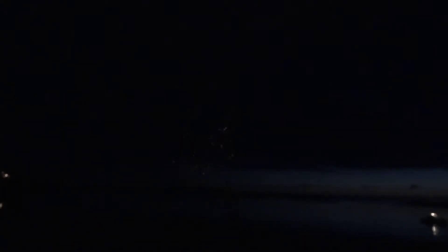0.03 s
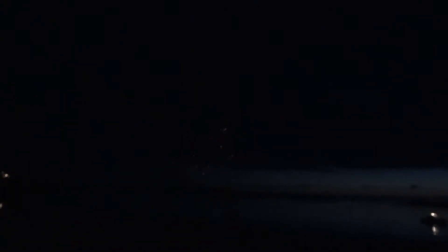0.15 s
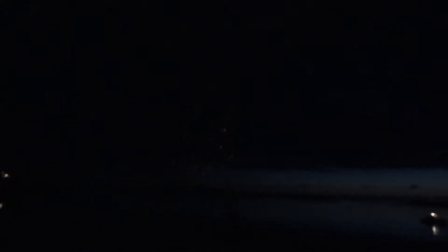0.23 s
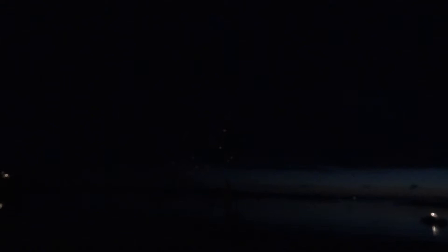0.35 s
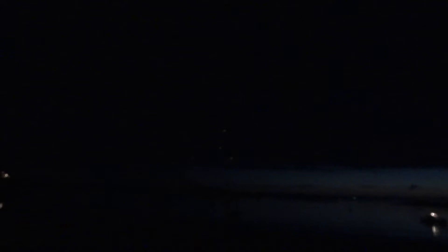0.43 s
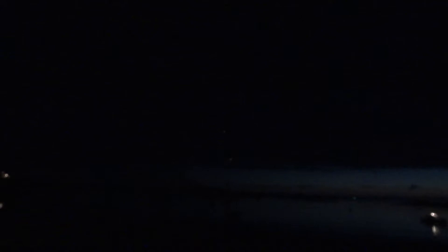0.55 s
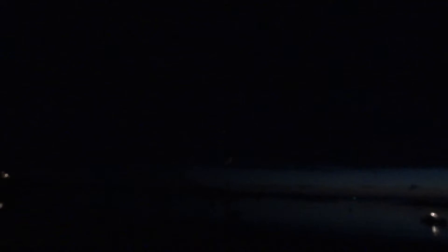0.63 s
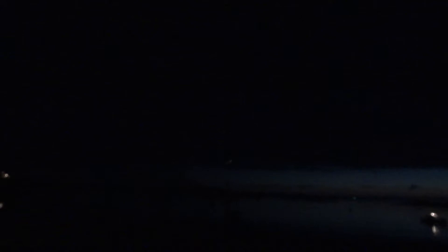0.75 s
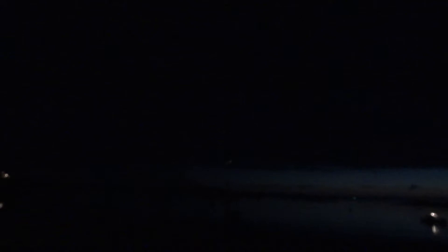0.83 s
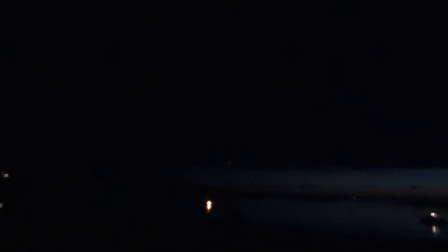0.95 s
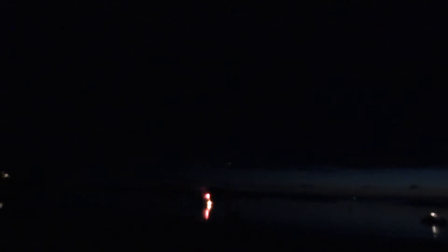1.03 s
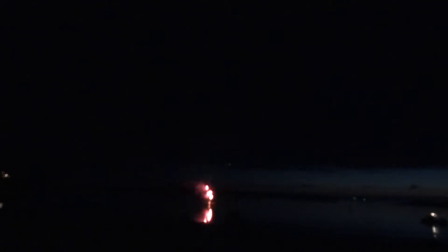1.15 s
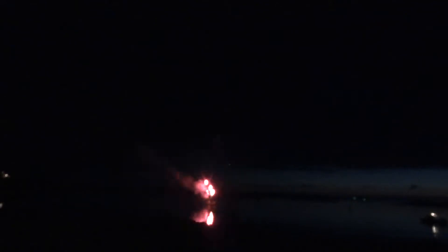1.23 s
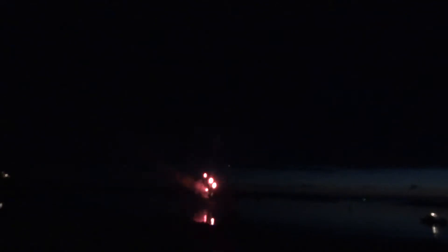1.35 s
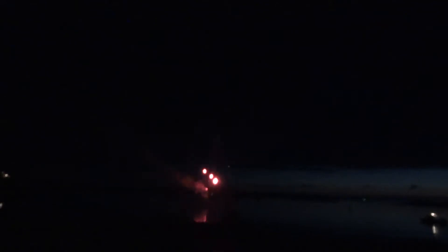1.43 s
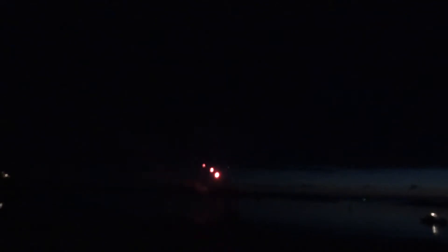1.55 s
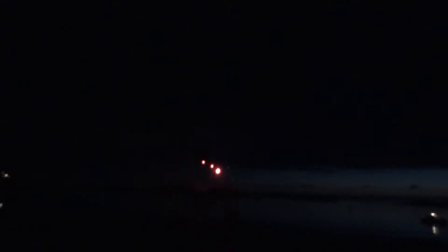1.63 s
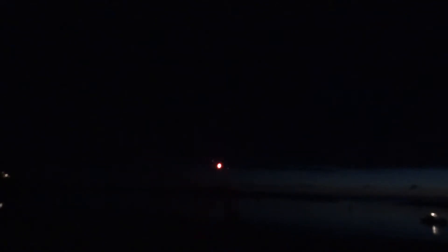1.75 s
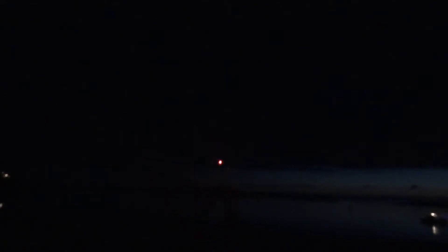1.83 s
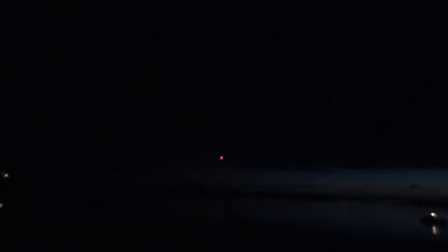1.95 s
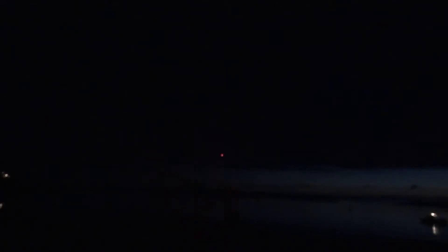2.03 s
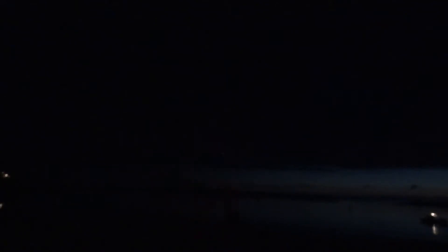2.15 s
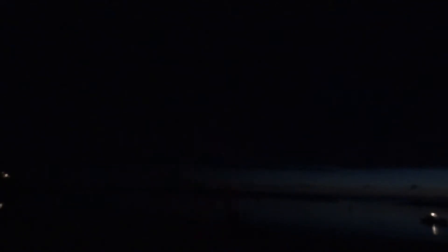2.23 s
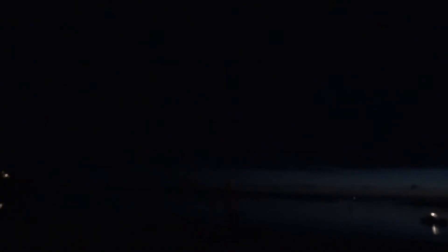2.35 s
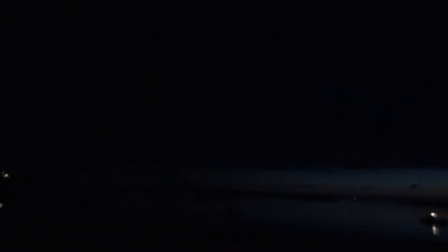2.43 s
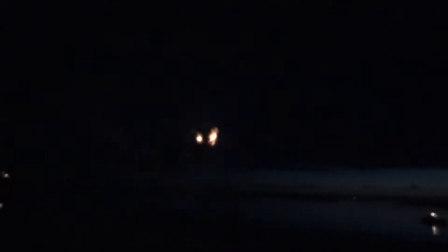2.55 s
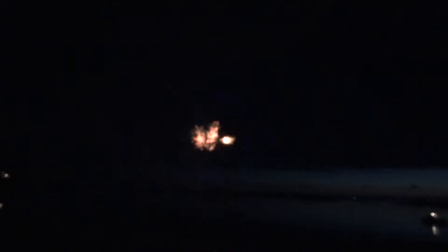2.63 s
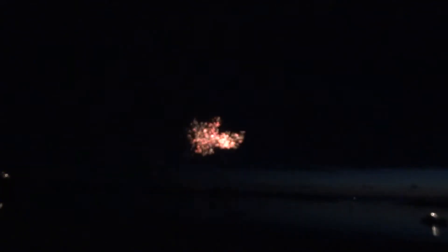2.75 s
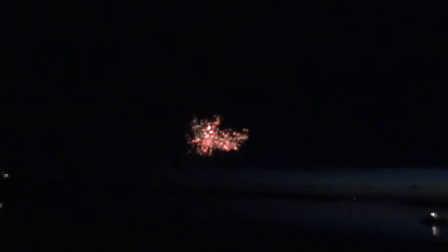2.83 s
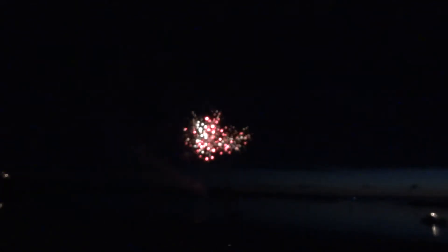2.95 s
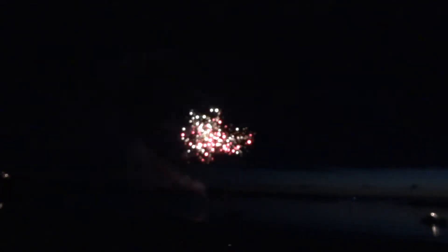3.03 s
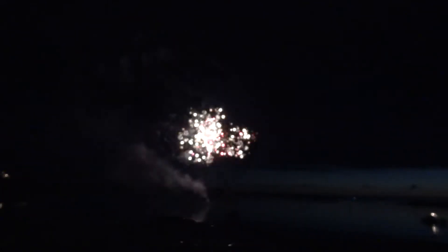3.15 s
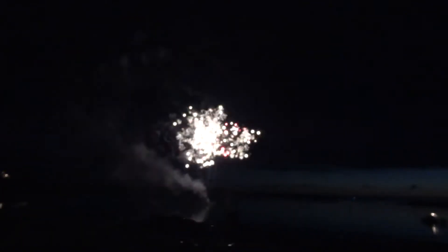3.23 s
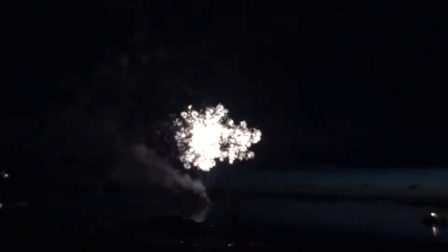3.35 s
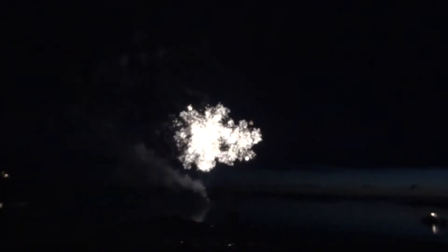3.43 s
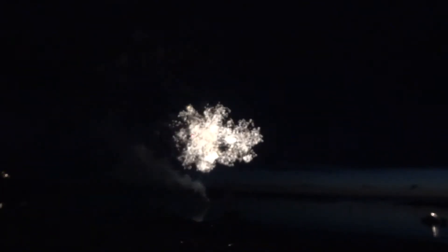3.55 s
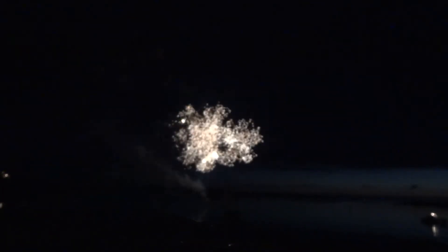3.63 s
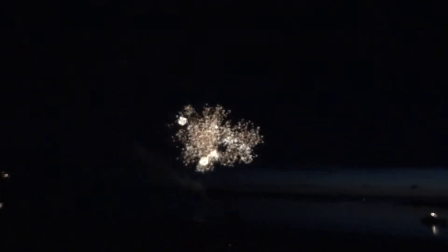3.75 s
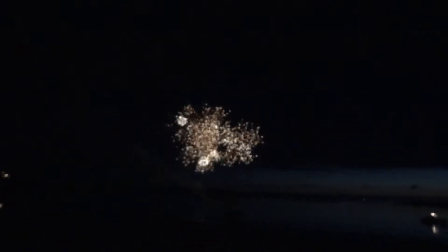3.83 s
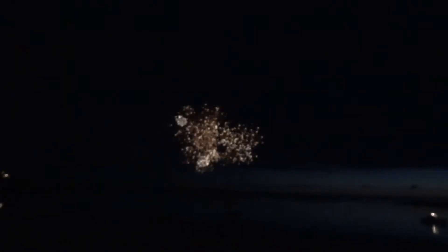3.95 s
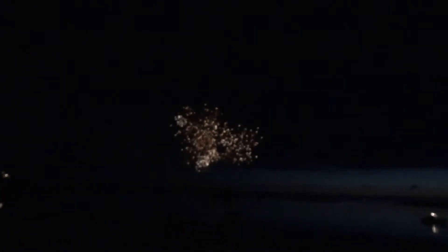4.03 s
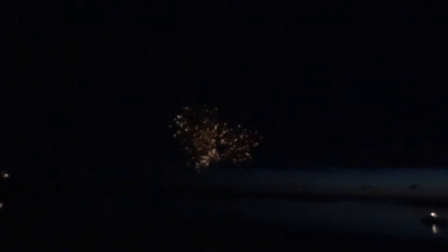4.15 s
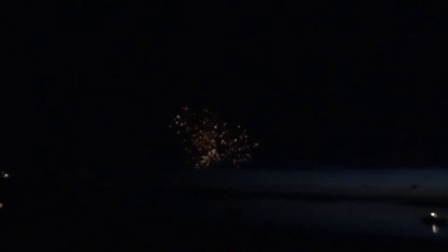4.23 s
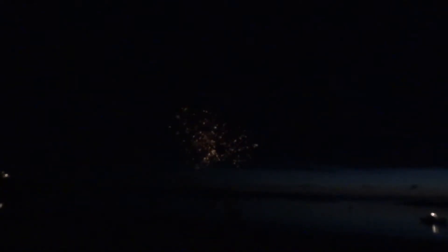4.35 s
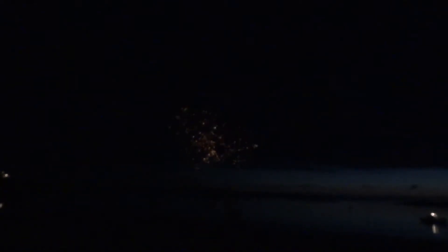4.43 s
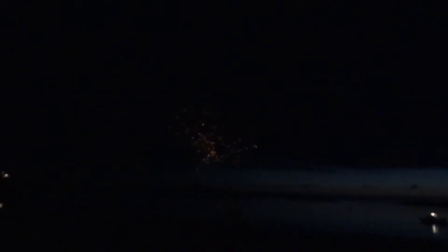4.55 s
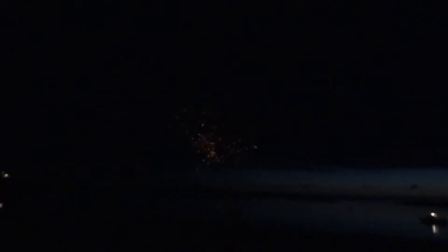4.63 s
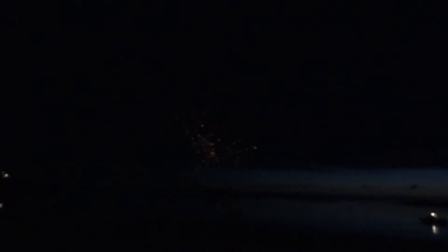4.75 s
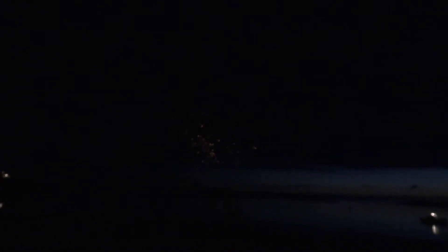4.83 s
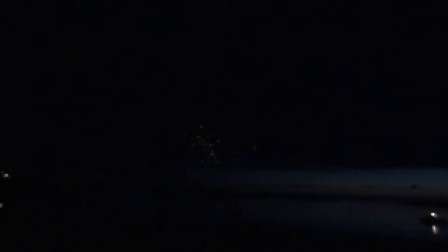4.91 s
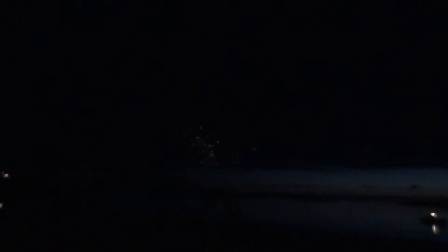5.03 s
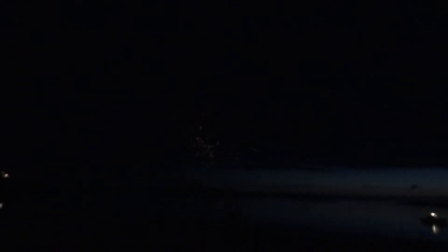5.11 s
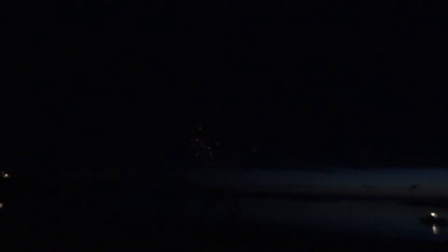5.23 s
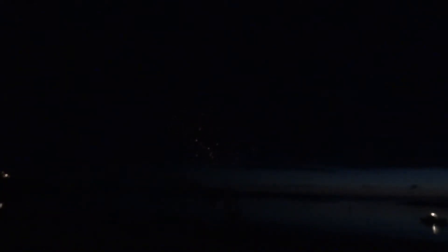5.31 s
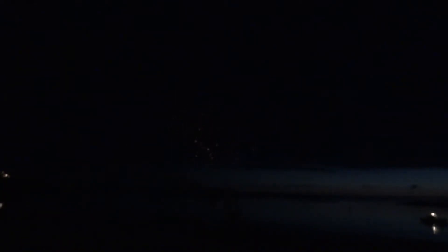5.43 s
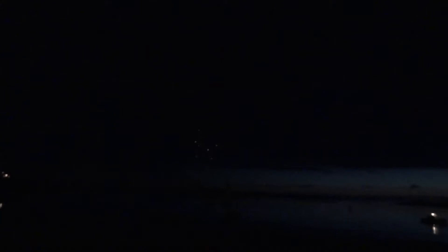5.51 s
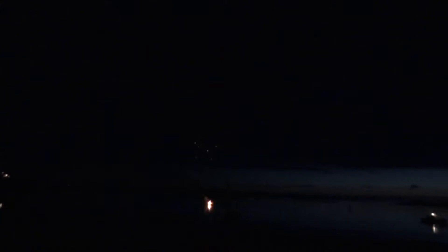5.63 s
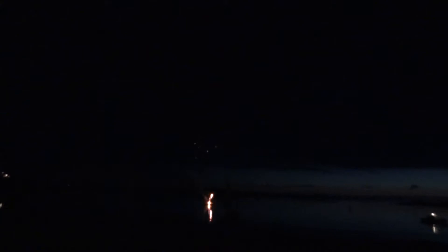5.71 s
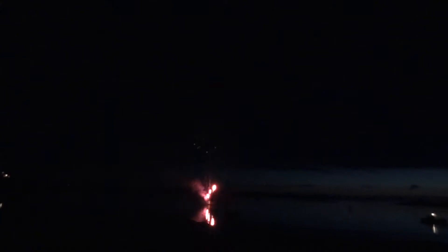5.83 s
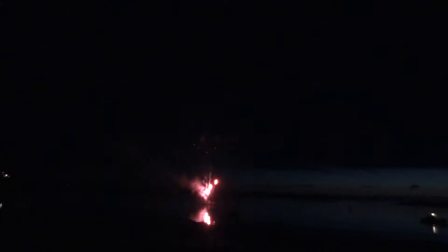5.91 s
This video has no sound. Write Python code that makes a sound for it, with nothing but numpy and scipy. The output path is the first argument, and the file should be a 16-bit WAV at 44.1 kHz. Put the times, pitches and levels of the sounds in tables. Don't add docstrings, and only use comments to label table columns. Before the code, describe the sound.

Night fireworks across a harbour, heard in stereo from the shore. From 0 to 1.6 s, soft distant thuds and low rumble of an earlier salvo fade, with faint clicks of the camera in the hand and a firmer creak near 1.5 s. At 1.64-1.75 s three hard launch cracks fire in quick succession, with a short rattle and wall slaps, then a falling rumble. Close plastic creaks come around 1.95, 2.2 (with a tiny squeak) and 2.7 s. At 3.18-3.38 s a tight volley of very loud thumping bursts, slightly squashed, with late bangs at 3.6 and 3.7 s. Sharp pops begin among them, swelling into dense dry crackle, thickest near 3.9 s, thinning to loud snaps and ending at 4.3 s. A big echo thump at 4.54 s and softer ones near 5 s follow, over a dull roll and airy rush fading to 6 s.

```python
import sys
import numpy as np
from scipy import signal
from scipy.fft import rfft, irfft
from scipy.io import wavfile
from scipy.ndimage import uniform_filter1d

SR = 44100
rng = np.random.default_rng(int(sys.argv[2]) if len(sys.argv) > 2 else 0)


def amp(db):
    return 10 ** (np.asarray(db, float) / 20)


def write(x):
    x = np.atleast_2d(x).T
    wavfile.write(sys.argv[1], SR, np.round(np.clip(x, -1, 1) * 32767).astype(np.int16))


N = 263718

# start_s, thump_db, front_db
BANGS = [(1.6418, -7, -9), (1.7035, -8, -13), (1.7496, -8, -8), (3.1811, -7, -8), (3.1908, -6, -8),
         (3.2208, -9, -15), (3.2278, -6, -8), (3.2375, -7, -9), (3.2664, -14, -12), (3.2962, -7, -8),
         (3.3055, -6, -8), (3.3369, -6, -16), (3.3638, -10, -15), (3.3819, -12, -10), (3.6032, -10, -14),
         (3.7273, -7, -14)]
# start_s, level_db
THUDS = [(0.0169, -26), (0.0609, -23), (0.2397, -19), (0.3533, -29), (0.8344, -27), (1.4008, -26),
         (1.546, -28), (1.6584, -18), (1.721, -17), (1.7244, -17), (1.9571, -17), (2.2334, -23),
         (2.5569, -24), (2.6182, -26), (2.9631, -25), (3.5183, -7), (3.7397, -10), (3.7628, -8),
         (4.5416, -8), (4.9569, -16), (4.9655, -17), (5.1057, -17), (5.1213, -18), (5.2765, -20)]
# freq_hz, level_db
BOOM_COLOUR = [(15, -17), (30, -19), (60, -6.5), (110, -0.5), (160, 0.5), (300, -1), (1000, -69)]
# freq_hz, level_db
BARGE_COLOUR = [(150, -29), (500, 1), (1000, 2.5), (2200, 3), (4500, -8.5), (7000, -19.5), (11000, -38)]
# freq_hz, level_db
QUAY_COLOUR = [(60, -39), (300, -7.5), (1000, -2), (3000, -15.5), (6000, -22.5), (12000, -28.5)]

# start_s, level_db
POPS = [(3.2519, -20), (3.283, -15), (3.2927, -14), (3.353, -19), (3.4299, -14), (3.448, -17),
        (3.5427, -17), (3.5455, -18), (3.56, -15), (3.6077, -15), (3.622, -9), (3.628, -11), (3.6445, -7),
        (3.6545, -12), (3.6724, -12), (3.6777, -15), (3.6848, -8), (3.6988, -10), (3.7025, -8),
        (3.7095, -10), (3.7178, -8), (3.7519, -8), (3.7599, -9), (3.7701, -7), (3.7743, -7), (4.25, -7),
        (4.2554, -7), (4.3013, -6), (4.3037, -7), (4.3131, -10),
        (4.0737, -7), (4.0774, -7), (4.0811, -8), (4.0903, -10), (4.0977, -7), (4.1001, -8),
              (4.1031, -6), (4.1113, -7), (4.1168, -7), (4.1238, -8), (4.1266, -6), (4.1349, -8),
              (4.1383, -6), (4.1416, -9), (4.1473, -6), (4.1577, -10), (4.1622, -8), (4.1687, -9),
              (4.1709, -6), (4.1755, -9), (4.1834, -7), (4.1853, -8), (4.2006, -9), (4.2035, -8),
              (4.21, -9), (4.2148, -9), (4.2191, -6), (4.2257, -9)]
# time_s, rate_pops_per_s, level_db
SWARM = [
    (3.56, 60, -20),
    (3.7, 400, -15),
    (3.745, 400, -15),
    (3.78, 1400, -10.5),
    (3.9, 1700, -10),
    (4.0, 850, -8.5),
    (4.07, 500, -8),
    (4.08, 400, -16),
    (4.235, 150, -18),
]

# start_s, level_db
SLAPS = [(0.0062, -27), (0.477, -31), (0.5228, -33), (1.6447, -13), (1.6475, -13), (1.6489, -19),
         (1.6507, -19), (1.7107, -22), (1.7468, -20), (1.7561, -20), (1.7579, -18), (1.7969, -22),
         (1.8492, -23), (1.8975, -29), (2.0829, -35), (2.1256, -31), (2.2334, -25), (2.2866, -28),
         (2.4026, -33), (2.5569, -36), (2.9868, -39), (3.1598, -39), (4.4966, -18), (4.6898, -18),
         (4.7404, -22), (4.7884, -16), (4.8117, -16), (4.9667, -21), (5.5303, -29)]
# delay_s, level_db
WALLS = [(.0033, -15), (.0307, -17), (.1415, -14), (.3196, -18)]
FACING_DB = (-8, -9, 0)

# time_s, level_db
ROLLS = [
    [(0.0, -32), (0.21, -37.5), (0.35, -35), (0.75, -39.5), (0.95, -35.5), (1.1, -38), (1.64, -39)],
    [(1.65, -25), (1.69, -28), (1.74, -24), (1.82, -33), (2.11, -35.5), (2.46, -39), (2.77, -44),
     (3.0, -41.5), (3.18, -44.5)],
    [(3.195, -21), (3.24, -19), (3.29, -17), (3.313, -28), (3.345, -19), (3.365, -14.5), (3.5, -16),
     (3.6, -20)],
    [(3.68, -16), (3.775, -18), (3.8, -25), (3.95, -29), (4.11, -24.5), (4.3, -26), (4.45, -27)],
    [(4.67, -24), (4.8, -24.5), (4.94, -28.5), (5.1, -32.5), (5.38, -33.5), (5.6, -37.5), (5.98, -36)],
]
# start_s, end_s, rush_db, fizz_db, sizzle_db
FEEDS = [(-1.0, 0.0, -34.5, -49, -80), (0.28, 0.38, -43, -55, -80), (0.85, 1.1, -47, -75, -90),
         (1.755, 1.8, -34, -48, -55), (1.9, 2.1, -50, -58, -63), (2.9, 3.1, -52, -75, -90),
         (3.24, 3.29, -24, -37, -50), (3.35, 3.55, -28, -38, -40), (3.595, 3.68, -27, -34, -38),
         (3.77, 3.97, -27, -28, -36), (4.15, 4.35, -34, -39, -53), (4.3, 4.8, -32, -44, -78),
         (5.2, 5.4, -40, -58, -90)]
FADE_DB_PER_S = (16, 29, 60)
# freq_hz, level_db
ROLL_COLOUR = [(20, -47), (40, -38), (70, -29), (120, -9.5), (200, -1), (310, 0), (430, -2), (600, -14),
               (900, -15), (2000, -62)]
RUSH_COLOUR = [(40, -12), (500, 2.5), (800, -0.5), (1400, -3), (2200, -8), (3200, -16.5), (4500, -26.5),
               (7000, -60)]
FIZZ_COLOUR = [(1000, -48), (2200, -0.5), (3200, -1.5), (4500, -4.5), (6000, -14), (8000, -28),
               (11000, -60)]
SIZZLE_COLOUR = [(3000, -15), (5500, 3.5), (7000, 2), (9000, -3.5), (11000, -6.5), (13000, -3.5)]
# freq_hz, level_db
SPREAD = [(60, -14), (110, -26), (190, -24), (350, -18), (630, -14.5), (1130, -12), (2030, -12),
          (3640, -10.5), (6550, -7.5), (11800, -16)]
BUILD_S, BREEZE_DB = .03, -73

# start_s, level_db
SLIPS = [(0.2715, -46), (0.3485, -44), (0.3635, -42), (0.378, -43), (0.3925, -45), (1.2513, -53),
         (1.31, -44), (1.4722, -31.5), (1.4937, -41), (1.5161, -40), (1.937, -44), (1.973, -33),
         (2.1643, -21), (2.1903, -27.5), (2.206, -31), (2.2105, -27), (2.6692, -33), (2.6826, -24),
         (2.7328, -42), (2.7455, -31), (2.779, -36), (2.7889, -37)]
# start_s, end_s, rubbing_db, small_slips_db, first_gap_s
GRIPS = [
    (0.2715, 0.345, -72, -48, .0059),
    (1.463, 1.53, -49, -46, .009),
    (1.94, 1.985, -66, -54, .008),
    (2.158, 2.242, -50, -42, .011),
    (2.658, 2.712, -50, -48, .01),
    (2.73, 2.8, -51, -45, .009),
]
# time_s, low_hz, high_hz, level_db
SQUEAK = [
    (2.213, 3900, 5500, -60),
    (2.217, 3650, 5300, -39),
    (2.228, 3200, 5000, -49),
    (2.238, 3000, 4650, -46),
    (2.242, 2950, 4650, -60),
]
# freq_hz, level_db
CASING_COLOUR = [(700, -28), (1500, -12), (2600, -9.5), (3600, -6.5), (5100, -5), (6200, -3), (8300, -11.5),
                 (10200, -6.5), (12000, -23.5)]
SLOWING, UNEVEN, UNEVEN_DB = 11.3, .03, 1.8

# freq_hz, level_db
MICROPHONE = [(10, -30), (40, -6), (100, 0), (10950, 0), (11100, -25), (12400, -33), (14000, -90)]
HISS_DB = -77


def evened(x):
    return x / np.sqrt(np.mean(x ** 2) + 1e-20)


def read(points):
    hz, db = np.transpose(points)
    bins_hz = np.fft.rfftfreq(N, 1 / SR)
    return amp(np.interp(np.log(bins_hz + 1), np.log(hz + 1), db))


def coloured(points):
    return evened(irfft(rfft(rng.standard_normal(N)) * read(points), N))


def train(times, gains):
    return np.bincount(np.round(np.asarray(times) * SR).astype(int), gains, N)[:N]


def sound_out(hits, shape, lead=20):
    return signal.oaconvolve(hits, shape)[lead:N + lead]


def stereo(mid, side):
    return np.array([mid + side, mid - side])


def grains(per_s, spread_db):
    size = amp(spread_db * np.minimum(rng.exponential(1, N), 4))
    sign = rng.choice([-1., 1.], N)
    return size * sign * (rng.random(N) < per_s / SR)


def pop(front_s, rebound_s, rebound):
    t = np.arange(-20, 60) / SR
    front = -np.exp(-(t / front_s) ** 2)
    return front + rebound * np.exp(-((t - 1.4 * rebound_s) / rebound_s) ** 2)


def nearby(hits, colour, t60, side_db):
    t = np.arange(0, min(t60, 3), 1 / SR)
    arrival = np.clip(t / .002 - 1, 0, 1)
    decay = amp(-120 * t / t60) * arrival
    cloud = np.sqrt(abs(signal.fftconvolve(hits ** 2, decay)[:N]))
    return cloud * stereo(coloured(colour), amp(side_db) * coloured(colour))


def gas_thumps(s, thump_db, direct):
    t = np.arange(400) / SR
    turns = 440 * t - 24000 * t ** 2
    onset = 1 - np.exp(-(t / .00017) ** 2)
    swing = np.cos(2 * np.pi * (turns - .17)) * onset * np.exp(-(t / .0043) ** 4)
    launch_cut_db = 1.5 * (s < 2)
    thumps = sound_out(train(s, direct * amp(thump_db + 1 - launch_cut_db)), swing, 0)
    rounded = np.convolve(swing * np.hanning(800)[270:670], np.hanning(18) / 9)
    rounded = signal.lfilter(*signal.butter(1, 110, "high", fs=SR), rounded)
    return thumps + sound_out(train(s, ~direct * amp(thump_db + 2.5)), rounded, 9)


def bangs():
    s, thump_db, front_db = np.transpose(BANGS + [(at, db, -60) for at, db in THUDS])
    direct = front_db > -25
    thumps = gas_thumps(s, thump_db, direct)
    fronts = sound_out(train(s, direct * amp(1.3 * front_db + 4.5)), pop(.000058, .00008, .15))
    shocks = train(s, amp(front_db))
    boom = amp(-22) * nearby(shocks, BOOM_COLOUR, .9, -21) + amp(-48.5) * coloured(BOOM_COLOUR)
    launches = train(s, direct * (s < 2) * amp(thump_db))
    fronts += amp(-11) * sound_out(launches, pop(.00005, .00016, 1.1))
    rattle = amp(-12) * nearby(launches, BARGE_COLOUR, .12, -16)
    scatter = amp(-15) * nearby(shocks, QUAY_COLOUR, .099, -9)
    sway = .12 * np.sin(40 * np.arange(N) / SR)
    return stereo(thumps + fronts, thumps * sway) + rattle + scatter + boom


def crackle():
    s, db = np.transpose(POPS)
    at, per_s, swarm_db = np.transpose(SWARM)
    t = np.arange(N) / SR
    stars = abs(grains(np.interp(t, at, per_s, 0, 0), 2.2))
    swarm = stars * amp(np.interp(t, at, swarm_db) - 4)
    hits = train(s, amp(db + .8)) + swarm
    shape = signal.lfilter(*signal.butter(2, 500, "high", fs=SR), pop(.000063, .000098, 1.1))
    placed = stereo(hits, .043 * hits * rng.standard_normal(N))
    pops = np.array([sound_out(channel, shape) for channel in placed])
    early = train(s, (abs(s - 3.5) < .14) * amp(db))
    edge = amp(-7) * sound_out(early, pop(.00003, .00004, .8))
    spit = amp(-21) * nearby(early, SIZZLE_COLOUR, .035, -8)
    scatter = amp(-26) * nearby(hits, QUAY_COLOUR, .02, -12)
    return pops + edge + spit + scatter


def slaps():
    walls = []
    for bang, facing in zip(BANGS, FACING_DB):
        walls += [(bang[0] + lag, db + facing) for lag, db in WALLS]
    s, db = np.transpose(SLAPS + walls)
    late = s > 4.4
    near = sound_out(train(s, ~late * amp(db + 4)), pop(.0001, .00019, .72))
    far = sound_out(train(s, late * amp(db)), pop(.00017, .00017, 1.4), 26)
    return stereo(near + far, .11 * (far - near))


def return_levels():
    t = np.arange(N) / SR
    roll_curve = sorted(map(tuple, np.concatenate(ROLLS)))
    levels = [amp(np.interp(t, *np.transpose(roll_curve)))]
    start, end, *fed_db = np.transpose(FEEDS)[:, :, None]
    build = np.clip((t - start) / BUILD_S, 0, 1)
    for db, fade in zip(fed_db, FADE_DB_PER_S):
        fed = build * amp(db - fade * np.maximum(t - end, 0))
        levels.append(np.linalg.norm(fed, axis=0))
    levels[3] = levels[3] + amp(BREEZE_DB) * (t < BANGS[3][0])
    return levels


def returns():
    colours = (ROLL_COLOUR, RUSH_COLOUR, FIZZ_COLOUR, SIZZLE_COLOUR)
    arrivals_per_s = (1300, 3500, 5000, 4000)
    out, spread = 0, read(SPREAD)
    for level, colour, per_s in zip(return_levels(), colours, arrivals_per_s):
        gain = evened(read(colour))
        mid = irfft(rfft(grains(per_s, 2.5)) * gain, N)
        side = irfft(rfft(rng.standard_normal(N)) * gain * spread, N)
        out = out + level * stereo(evened(mid), side)
    return out


def stutter():
    start, end, _, db, gap = np.transpose(GRIPS)[:, :, None]
    k = np.arange(24)
    chance = rng.standard_normal((len(GRIPS), 24, 2))
    gaps = gap * (1 + (k / SLOWING) ** 3) * abs(1 + UNEVEN * chance[..., 0])
    s = start + np.cumsum(gaps, axis=1)
    db = db + UNEVEN_DB * chance[..., 1]
    return np.transpose([s[s < end], db[s < end]])


def handling():
    s, db = np.concatenate([SLIPS, stutter()]).T
    t = np.arange(600) / SR
    puff = (1 - np.exp(-t / .0004)) * amp(-60 * t / .013)
    slips = sound_out(train(s - .0006, amp(db)), puff, 0)
    t = np.arange(N) / SR
    rubs = sum(amp(rub_db) * (t > start) * (t < end) for start, end, rub_db, _, _ in GRIPS)
    shape = slips + uniform_filter1d(rubs, size=400)
    at, low_hz, high_hz, squeak_db = np.transpose(SQUEAK)
    squeak = 0
    for hz in (low_hz, high_hz):
        squeak = squeak + np.sin(2 * np.pi * np.cumsum(np.interp(t, at, hz)) / SR)
    squeak = squeak * amp(np.interp(t, at, squeak_db, -120, -120))
    mid = shape * coloured(CASING_COLOUR) + squeak
    side = amp(-11) * shape * coloured(CASING_COLOUR)
    return stereo(mid, side) * amp([[-.8], [.8]])


def scene():
    return bangs() + crackle() + slaps() + returns() + handling()


def band_limit(x):
    return signal.sosfilt(signal.butter(12, 12380, fs=SR, output="sos"), x)


def record(dry):
    mid, side = rng.standard_normal((2, N))
    x = dry + amp(HISS_DB + 8) * stereo(mid, .6 * side)
    x = 0.81 * np.tanh(x / 0.74)
    x = irfft(rfft(x) * read(MICROPHONE), N)
    return band_limit(x)


dry = scene()
out = record(dry)
write(out)
```